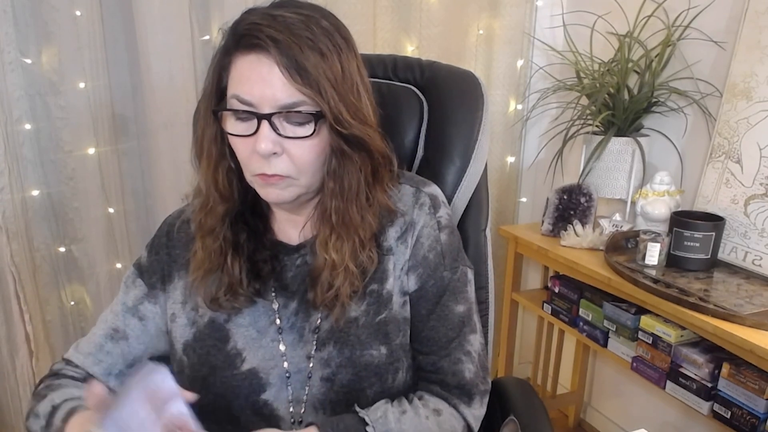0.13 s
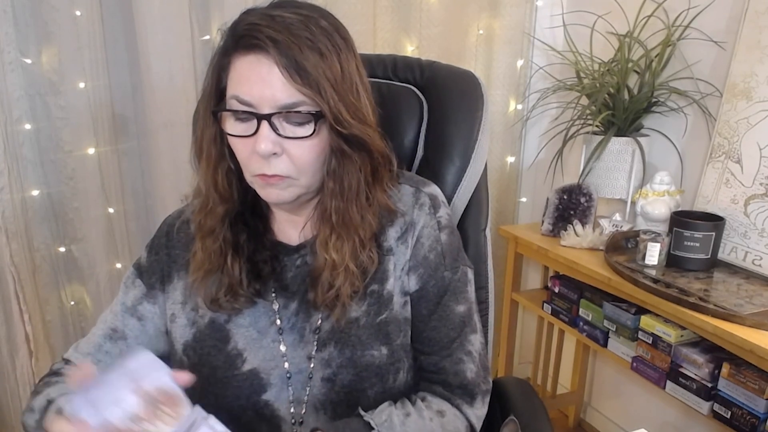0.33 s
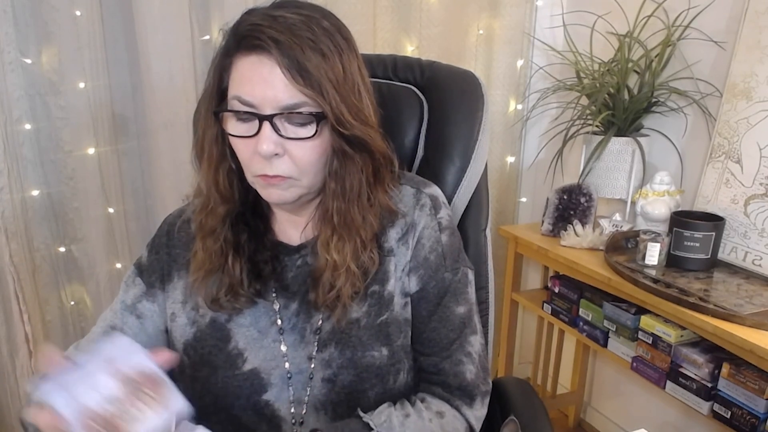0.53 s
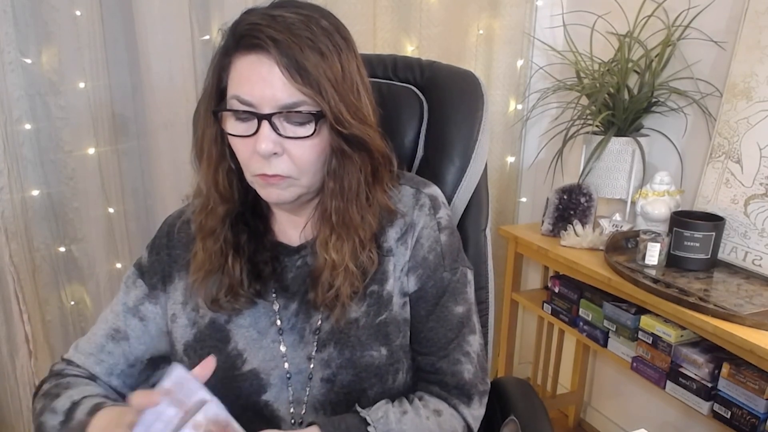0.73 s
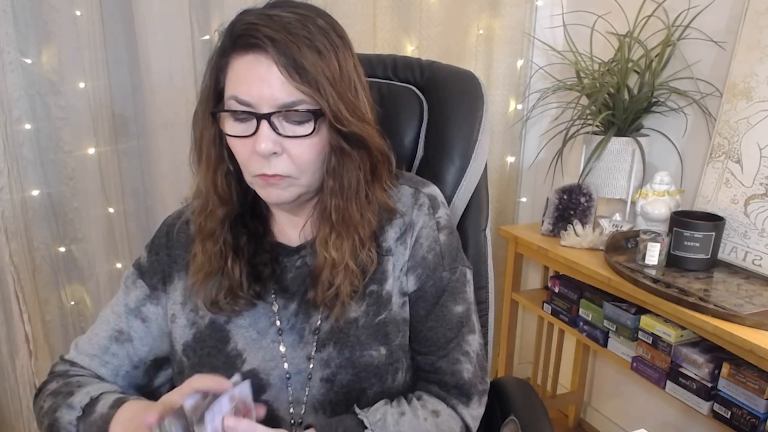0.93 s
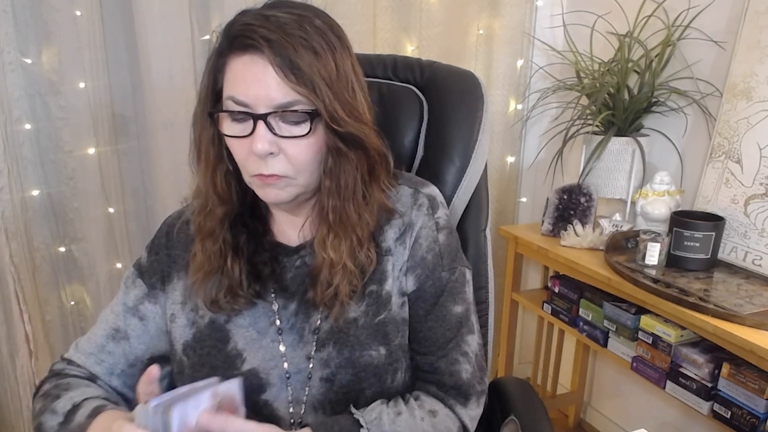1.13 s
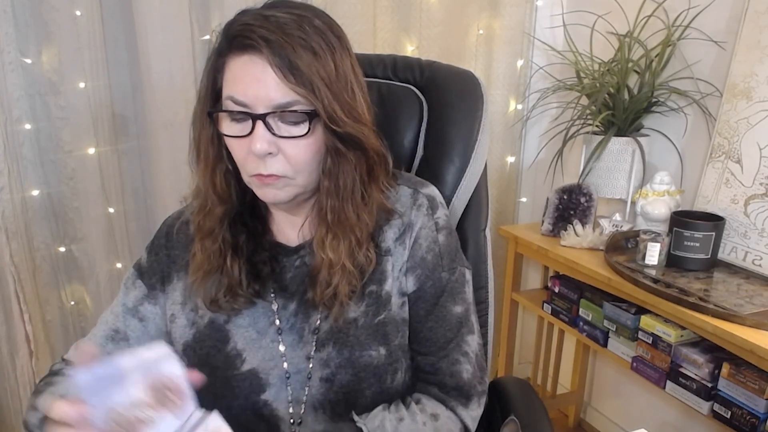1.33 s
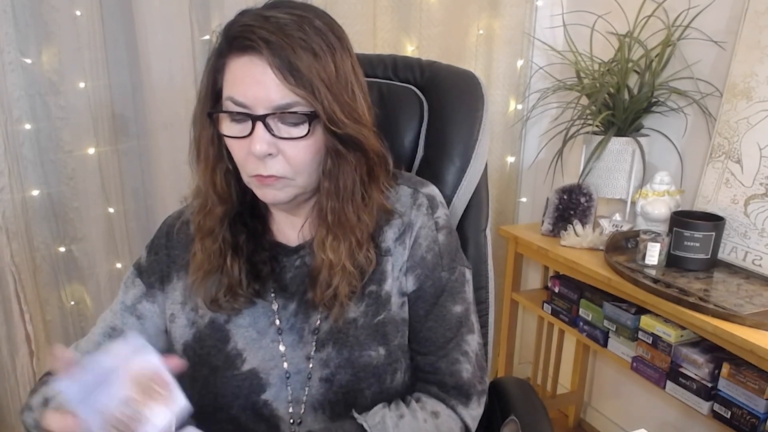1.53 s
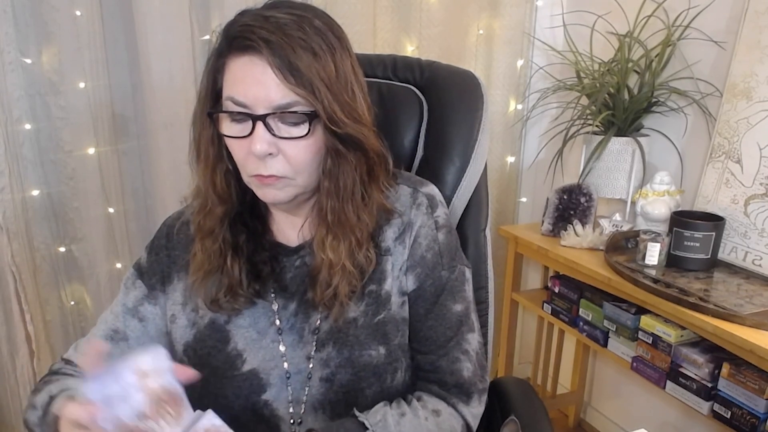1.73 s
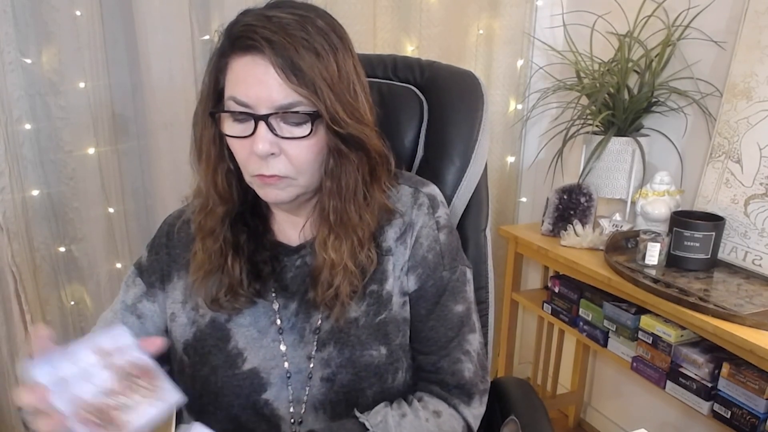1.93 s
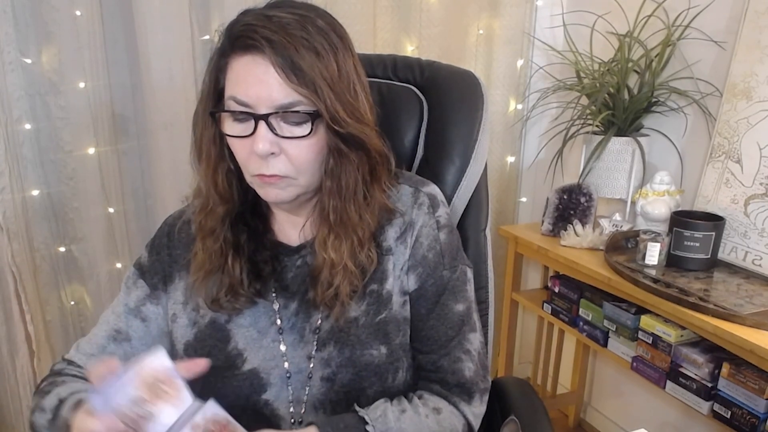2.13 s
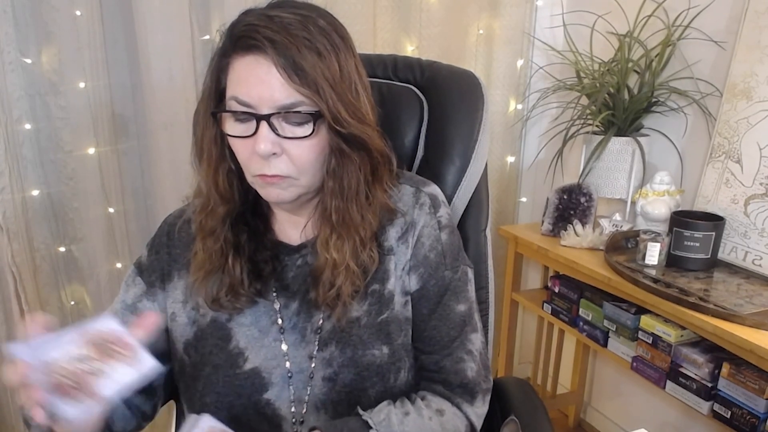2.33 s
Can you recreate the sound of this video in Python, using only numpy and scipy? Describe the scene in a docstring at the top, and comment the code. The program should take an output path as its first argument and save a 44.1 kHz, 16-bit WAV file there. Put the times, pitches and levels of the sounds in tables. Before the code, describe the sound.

A deck of cards is hand shuffled close up, slapping and sliding in a quiet room.

```python
"""Snaps and short hissing slides of an overhand card shuffle, close up in a small, quiet, soft room.
Packets slap into the deck, then slide home: faces hiss, edges chatter in the deck's short resonances,
and now and then a packet flutters on one woody note.
A low room rumble lies below, and bumps reach the microphone through the desk."""
import sys
import numpy as np
from scipy import signal
from scipy.fft import rfft, irfft
from scipy.io import wavfile

SR = 44100
rng = np.random.default_rng(int(sys.argv[2]) if len(sys.argv) > 2 else 0)


def to_wav(s):
    """Save 16-bit WAV."""
    ch = np.atleast_2d(s).T  # columns
    pcm = np.round(np.clip(ch, -1, 1) * 32767)  # PCM
    wavfile.write(sys.argv[1], SR, pcm.astype(np.int16))


N = 109323


def from_db(db):
    """Decibels to gain."""
    return 10 ** (np.asarray(db) / 20)


def unit_rms(x):
    """Scale to rms 1."""
    return x / np.sqrt(np.mean(x ** 2) + 1e-20)


def drift(rate_hz):
    """Random wander below about rate_hz; rms 1."""
    r = np.exp(-2 * np.pi * rate_hz / SR)
    return unit_rms(signal.lfilter([1], [1, -2 * r, r * r], rng.standard_normal(N + 20000))[20000:])


def ring(clicks, hz, t60_s):
    """Resonator: a unit click starts a decaying sine of height 1."""
    r, w = from_db(-60 / (t60_s * SR)), 2 * np.pi * hz / SR
    return signal.lfilter([0, np.sin(w)], [1, -2 * r * np.cos(w), r * r], clicks + 1e-18)


def coloured_noise(spectrum):
    """Noise shaped by (f/Hz, level/dB) points; rms 1."""
    hz, db = np.transpose(spectrum)
    grid_hz = np.maximum(np.fft.rfftfreq(N, 1 / SR), 1)
    shape = from_db(np.interp(np.log(grid_hz), np.log(hz), db, right=-120))
    return unit_rms(irfft(rfft(rng.standard_normal(N)) * shape, N))


def room_tone(level_db=-59, waver_db=1):
    """Quiet room noise whose low rumble wavers."""
    # noise spectrum: f/Hz, relative density/dB
    spectrum = [(15, -39), (25, -5.5), (65, 1), (97, -18.5), (119, -5), (190, -5), (253, -15.5),
                (346, -17.5), (472, -36), (12500, -51.5), (16200, -103)]
    tone = from_db(level_db) * coloured_noise(spectrum)
    rumble = signal.sosfilt(signal.butter(2, 400, fs=SR, output="sos"), tone)
    return tone + rumble * (from_db(waver_db * drift(7.2)) - 1)


def desk_bumps(attack_cycles=0.45):
    """Soft low bumps swell and ring in the desk."""
    # bumps: t/s, level/dB, f/Hz, t60/s
    bumps = [(.003, -22.5, 65.5, 0.16), (.037, -21.5, 41, 0.21), (1.33, -48.5, 47.3, 0.99),
             (1.6849, -32.5, 142, 0.035), (2.344, -50, 40, 0.62), (2.399, -45.5, 48.3, 0.47)]
    t, out = np.arange(N) / SR, 0
    for start_s, db, hz, t60_s in bumps:
        age_s = np.maximum(t - start_s, 0)
        attack = 1 - np.exp(-age_s * hz / attack_cycles)
        out += from_db(db - 60 * age_s / t60_s) * attack * np.sin(2 * np.pi * hz * age_s)
    return out


def slide_gains(fall_db_per_s=495):
    """Edge and face gains as cards slide on cards: rise, hold, decay; powers add."""
    # slides: t/s, rise/s, hold/s, relative edge level/dB, relative face level/dB
    slides = [(0.029, 0.0016, 0.018, -60, -61.5), (0.066, 0.0035, 0.0079, -49.5, -52),
              (0.091, 0.0017, 0.019, -52.5, -49.5), (0.131, 0.0021, 0.0064, -42.5, -50.5),
              (0.151, 0.011, 0.055, -55.5, -58), (0.224, 0.0068, 0.051, -57.5, -62),
              (0.285, 0.011, 0.018, -54, -57.5), (0.57, 0.0064, 0.0077, -51.5, -61),
              (0.579, 0.013, 0.011, -44, -46), (0.595, 0.0067, 0.026, -40.5, -44.5),
              (0.647, .005, 0.052, -61.5, -60.5), (0.697, 0.00098, 0.0039, -58.5, -68),
              (0.73, 0.013, 0.48, -76, -77.5), (0.752, 0.031, 0.0092, -68.5, -60.5),
              (0.808, 0.011, 0.007, -69, -62), (0.841, 0.025, 0.14, -71, -74.5),
              (1.032, 0.03, 0.021, -79, -71), (1.198, 0.042, 0.05, -98, -55),
              (1.264, 0.0067, 0.011, -80, -53), (1.316, 0.009, 0.0086, -74, -70.5),
              (1.5566, 0.0012, 0.003, -56.5, -59), (1.568, 0.0028, 0.0088, -43.5, -53.5),
              (1.572, 0.016, 0.024, -57.5, -41), (1.605, 0.0075, 0.039, -45.5, -56.5),
              (1.67, 0.01, 0.028, -45.5, -52.5), (1.706, 0.012, 0.0041, -51.5, -59),
              (1.988, 0.0088, 0.026, -48.5, -55.5), (2.015, 0.0021, 0.022, -52.5, -48),
              (2.042, 0.0036, 0.021, -43.5, -45), (2.363, 0.037, 0.013, -72.5, -67.5),
              (2.402, 0.002, 0.0035, -43, -44.5), (2.411, 0.0059, 0.013, -50, -43),
              (2.434, 0.0075, 0.0065, -48, -43)]
    t, power = np.arange(N) / SR, np.zeros((2, N))
    for start_s, rise_s, hold_s, edge_db, face_db in slides:
        rise = np.clip((t - start_s) / rise_s, 0, 1)
        fall = from_db(-fall_db_per_s * np.maximum(t - start_s - rise_s - hold_s, 0))
        power += (from_db([[edge_db], [face_db]]) * rise * fall) ** 2
    return np.sqrt(power)


def deck_body(clicks):
    """Short resonances of the loose deck, alternating in sign."""
    # modes: f/Hz, level/dB, t60/s
    modes = [(750, -4, 0.0058), (1050, -2, 0.008), (1380, -1.5, 0.0071), (1752, -3.5, 0.014),
             (2354, 1.5, 0.0059), (3130, -1, 0.007), (3414, -0.5, 0.0072), (4320, 2.5, 0.0022)]
    return sum((-1) ** k * from_db(db) * ring(clicks, hz, t60_s)
               for k, (hz, db, t60_s) in enumerate(modes))


def edge_chatter(gain, clicks_per_s=7400, spread_db=4.5, clump_db=3, trim_db=-2.5):
    """Card edges catch and slip in dense uneven clicks that ring the deck."""
    sizes = from_db(spread_db * np.minimum(rng.exponential(1, N), 4))
    signs = rng.choice([-1, 1], N)
    clicks = sizes * signs * (rng.random(N) < clicks_per_s / SR)
    clicks *= from_db(clump_db * drift(120))
    return from_db(trim_db) * deck_body(clicks * gain) / np.std(deck_body(clicks))


def face_hiss(gain, swish_hz=7940, swish_t60_s=0.0011, grain_db=1.1):
    """Card faces rub: bright grainy noise, and a narrow swish that stands out under a light touch."""
    swish = ring(rng.standard_normal(N), swish_hz, swish_t60_s)
    swish = unit_rms(ring(swish, swish_hz, swish_t60_s))
    swish *= from_db(-6.5) * np.minimum(gain, from_db(-62))   # capped in louder slides
    # rubbing spectrum: f/Hz, relative density/dB
    spectrum = [(410, -38), (700, -19.5), (1280, -16.5), (7490, 0), (11700, -10.5), (16000, -15.5)]
    broad = from_db(-3) * gain * coloured_noise(spectrum)
    return from_db(grain_db * drift(300)) * (broad + swish)


def packet_slaps(ring_t60_s=0.006, crack_t60_s=0.015, thud_t60_s=0.044, after_db=-7):
    """A packet hits the deck: damped ring, bright crack, thud of the hollow between the hands."""
    # slaps: t/s, level/dB, ring f/Hz, hollow f/Hz, thud/dB re level, crack/dB re level
    slaps = [(0.094, -32.5, 1590, 304, -8, -3.5), (0.198, -46, 1830, 287, -12, 2),
             (0.2206, -43.5, 1940, 293, -22, -22), (0.314, -36, 1110, 300, -33, -10.5),
             (0.5832, -22, 1610, 281, -16.5, -10.5), (.5975, -34, 2020, 343, -8.5, -15),
             (0.611, -34.5, 1860, 280, -9.5, -16), (.709, -43.5, 2200, 297, -18, -7.5),
             (1.327, -47, 600, 205, 2.5, -6.5), (1.5648, -30.5, 1800, 388, -14, -2.5),
             (1.5663, -36, 1700, 414, -11, 1), (1.676, -30.5, 880, 417, -18.5, -13),
             (1.684, -27.5, 1510, 389, -4, -24), (1.733, -38.5, 1050, 337, -9, -5),
             (2.049, -41.5, 1620, 274, -8, 0), (2.4066, -25, 1530, 305, -17.5, -1.5),
             (2.436, -26, 1670, 276, -6.5, -7)]
    size = 4000
    out, t = np.zeros(N + size), np.arange(size) / SR
    lags_s = rng.uniform(0.00065, 0.003, (len(slaps), 3))
    noises = rng.standard_normal((len(slaps), size))
    crack_band = signal.butter(2, [2500, 13500], "band", fs=SR, output="sos")
    click = 1. * (t == 0)
    for (start_s, db, hz, thud_hz, thud_db, crack_db), lag_s, noise in zip(slaps, lags_s, noises):
        touches = click.copy()
        touches[(lag_s * SR).astype(int)] = from_db(after_db) * noise[:3]   # three after-touches
        snap = ring(touches, hz, ring_t60_s) + 0.59 * ring(touches, 1.78 * hz, ring_t60_s / 2)
        crack = signal.sosfilt(crack_band, noise) * from_db(crack_db - 60 * t / crack_t60_s)
        thud = ring(click, thud_hz, thud_t60_s) - ring(click, 1.266 * thud_hz, thud_t60_s) / 2
        i = int(start_s * SR)
        out[i:i + size] += from_db(db) * (snap + crack + from_db(thud_db) * thud)
    return out[:N]


def packet_flutters(touches_per_s=2700, t60_s=0.02):
    """A packet flutters over the deck's hollow: quick edge touches ring one woody note."""
    # flutters: t/s, length/s, f/Hz, level/dB
    flutters = [(0.131, 0.02, 1410, -43), (.625, 0.0036, 2270, -35.5), (2.017, 0.0048, 1410, -39),
                (2.05, 0.0235, 1660, -43), (2.438, 0.023, 1630, -44.5)]
    t, out = np.arange(N) / SR, 0
    touches = rng.standard_normal(N) * (rng.random(N) < touches_per_s / SR)
    for start_s, length_s, hz, db in flutters:
        swell = np.sin(np.pi * np.clip((t - start_s) / length_s, 0, 1)) ** .5
        out += from_db(db) * ring(touches * swell, hz, t60_s) / np.std(ring(touches, hz, t60_s))
    return out


def room_reverb(x, t60_s=0.17, level_db=-15):
    """Short dull tail of a soft-furnished room."""
    t = np.arange(SR // 2) / SR
    dull_noise = signal.lfilter([.5], [1, -.5], rng.standard_normal(len(t)))
    tail = dull_noise * from_db(-60 * t / t60_s) * (t > .003)
    return from_db(level_db) * signal.fftconvolve(x, tail / np.sqrt(np.sum(tail ** 2)))[:N]


def scene():
    """Cards, their reverb, desk bumps and room tone; mono."""
    edge_gain, face_gain = slide_gains()
    cards = edge_chatter(edge_gain) + face_hiss(face_gain) + packet_slaps() + packet_flutters()
    return (room_tone() + desk_bumps() + cards + room_reverb(cards))[None]


def record(dry, stop_hz=16800):
    """Steep low-pass."""
    return signal.sosfilt(signal.cheby2(12, 60, stop_hz, fs=SR, output="sos"), dry)


dry = scene()
out = record(dry)
to_wav(out)
```